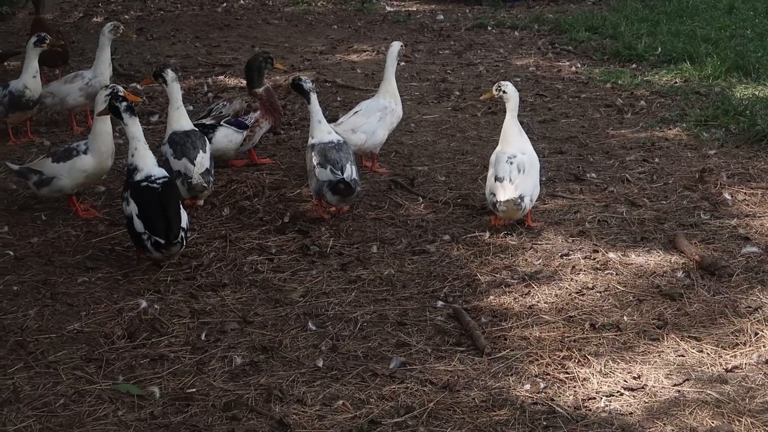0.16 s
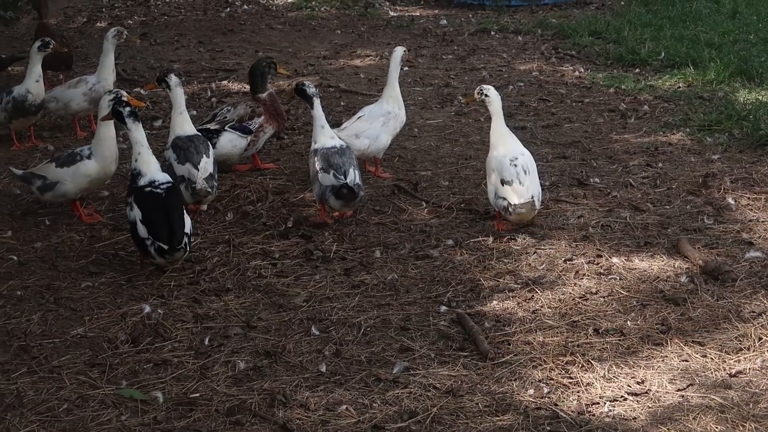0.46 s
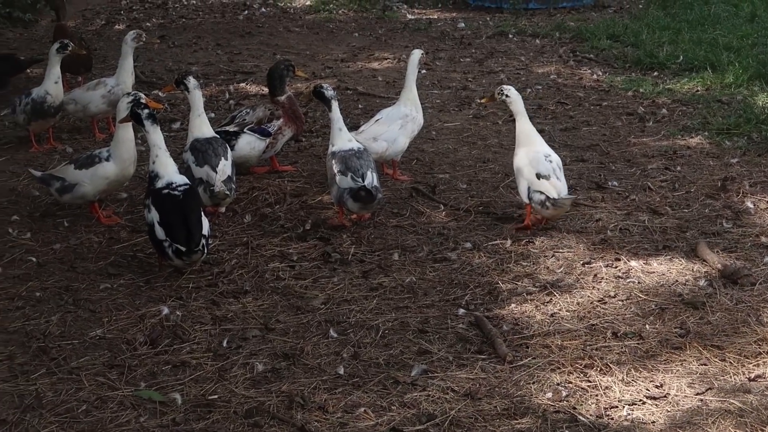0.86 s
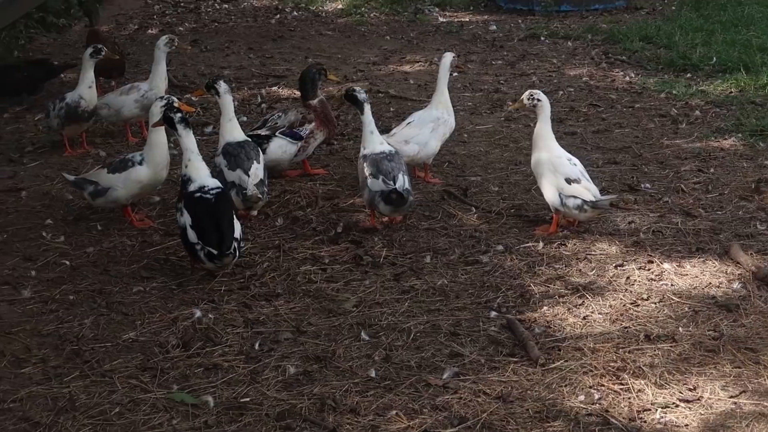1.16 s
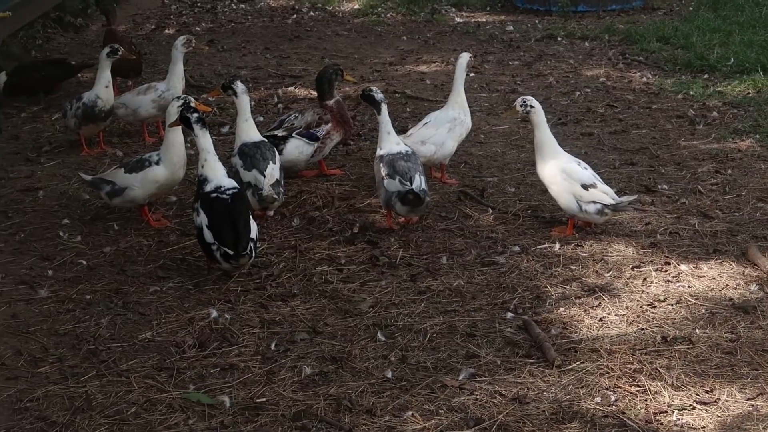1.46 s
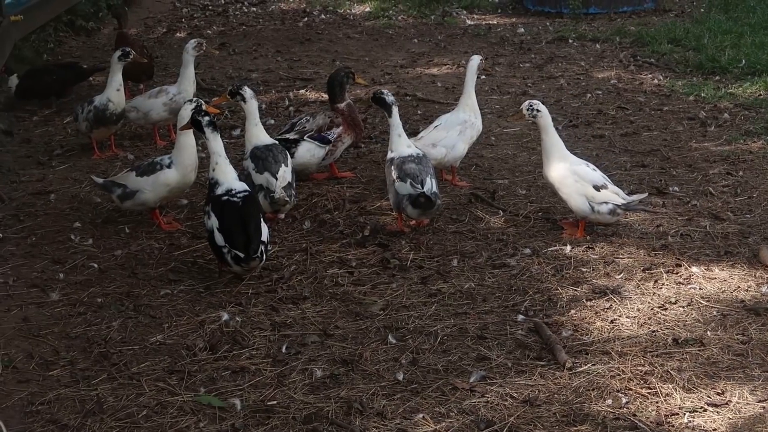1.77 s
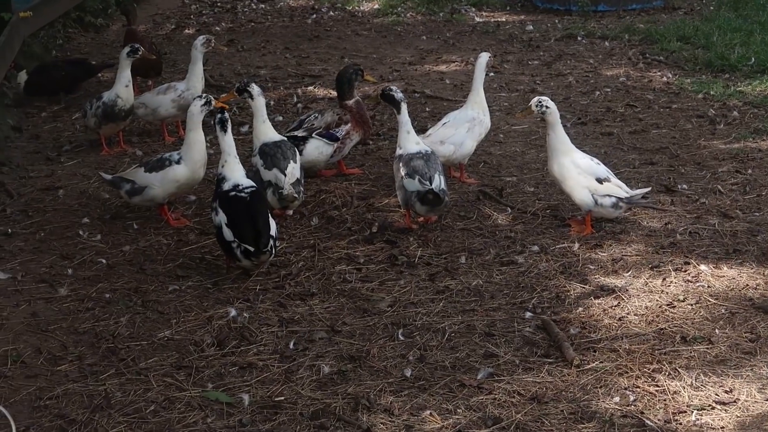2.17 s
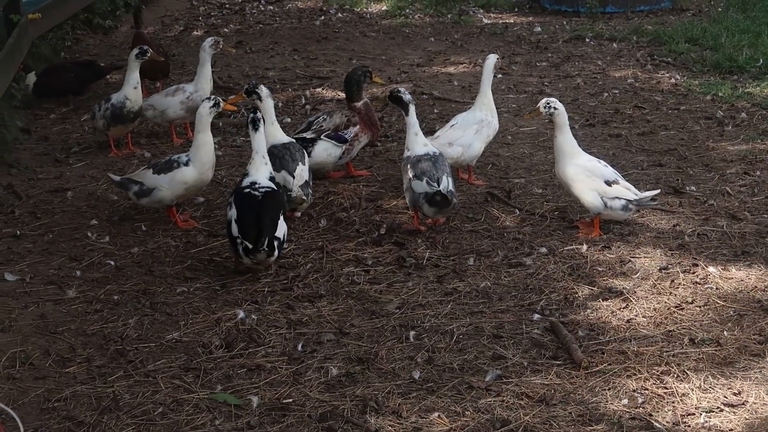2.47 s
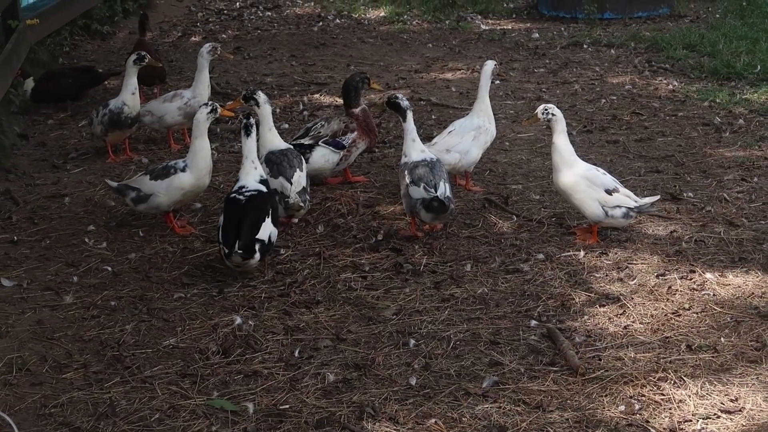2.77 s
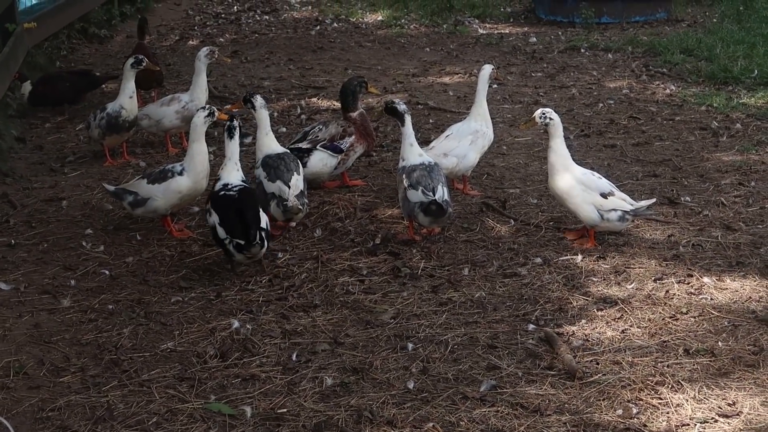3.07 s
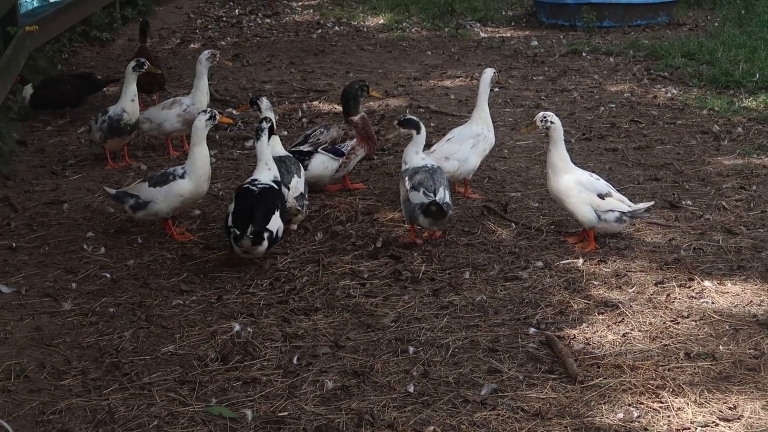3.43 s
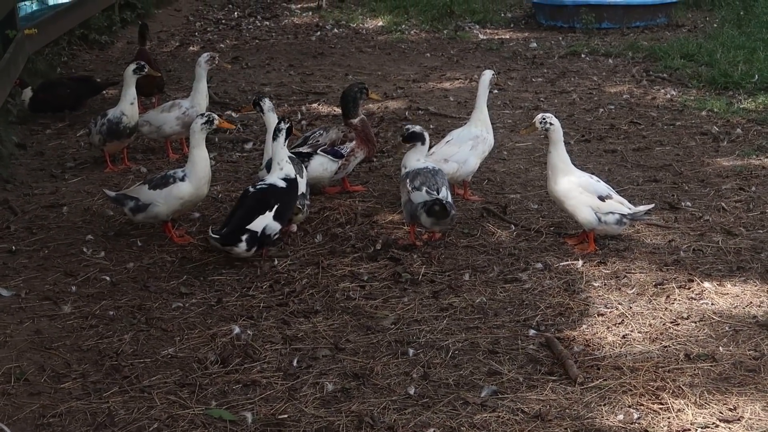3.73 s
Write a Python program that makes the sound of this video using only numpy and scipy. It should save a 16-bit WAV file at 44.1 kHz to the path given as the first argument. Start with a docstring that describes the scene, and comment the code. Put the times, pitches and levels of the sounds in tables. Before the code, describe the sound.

Ducks quack, rasp and honk in a farmyard, with wind bumping the microphone.

```python
"""A duck quacks close by in a farmyard under trees, and a drake rasps three times.
Both voices are quick clicks of the voice box ringing in the throat. Farther off, other fowl sing stacks
of tones, roughened by a second vibration: long wails, a squawk with peeps, and a hoarse honk that
clears as it sinks. Wind buffets the microphone at the start and the end, and a cricket chirps over
the steady noise of leaves and far traffic."""
import sys
import numpy as np
from scipy import signal
from scipy.fft import rfft, irfft
from scipy.io import wavfile
from scipy.ndimage import map_coordinates

SR = 44100
rng = np.random.default_rng(int(sys.argv[2]) if len(sys.argv) > 2 else 0)


def generate_wav(sig):
    """Save sig (samples, or channels by samples) to the path in sys.argv[1] as 16-bit PCM at SR."""
    pcm = np.round(np.clip(np.atleast_2d(sig).T, -1, 1) * 32767).astype(np.int16)
    wavfile.write(sys.argv[1], SR, pcm)


N = 171990
T = np.arange(N) / SR


def undb(db):
    return 10 ** (np.asarray(db) / 20)


def unit(x):
    return x / np.sqrt(np.mean(x ** 2) + 1e-30)


def shape_db(points, hz):
    """Read a curve of (f/Hz, level/dB) points; past its ends it drops 40 dB an octave."""
    f, db = np.array(points, float).T
    octave, known = np.log2(np.maximum(hz, 1)), np.log2(f)
    outside = np.maximum(known[0] - octave, 0) + np.maximum(octave - known[-1], 0)
    return np.interp(octave, known, db) - 40 * outside


def colour(x, points):
    """Make each frequency louder or softer, following (f/Hz, level/dB) points."""
    size = 8192
    cepstrum = irfft(shape_db(points, np.arange(size // 2 + 1) * SR / size) * np.log(10) / 20)
    cepstrum[1:size // 2] *= 2
    cepstrum[size // 2 + 1:] = 0  # ring after a click, never before it
    return signal.fftconvolve(x, irfft(np.exp(rfft(cepstrum))))[:N]


def noise(points):
    return unit(colour(rng.standard_normal(N), points))


def walk(hz):
    """A smooth random wobble of about size 1, with hz new values a second."""
    steps = rng.standard_normal(4000)
    return map_coordinates(steps, [np.minimum(T * hz, len(steps) - 1)], order=3)


def gate(t, db):
    """Loudness that follows the given times and levels, silent outside them."""
    return undb(np.interp(T, t, db)) * (T >= t[0]) * (T <= t[-1])


def split(x, edges_hz):
    """Cut a sound into bands, lowest first."""
    lows = [signal.sosfiltfilt(signal.butter(4, hz, fs=SR, output="sos"), x) for hz in edges_hz]
    return [b - a for a, b in zip([0] + lows, lows + [x])]


# How hard the wind blows: t/s, level/dB
GUSTS = [(0, -45.5), (.04, -30.5), (.075, -47.5), (.11, -25.5), (.17, -37), (.22, -41), (.6, -46.5),
         (1, -45.5), (1.45, -41.5), (1.9, -43), (2.5, -45.5), (2.58, -38), (2.7, -40.5), (2.84, -46.5),
         (2.98, -27.5), (3.07, -29), (3.2, -27.5), (3.26, -28), (3.36, -21.5), (3.44, -17.5), (3.52, -24),
         (3.62, -19.5), (3.72, -24), (3.9, -29)]
# Tone of strong gusts, light breeze and swirls of air: f/Hz, level/dB
GUST_TONE = [(12, -55), (20, -15), (70, 5), (133, 5), (347, -15.5), (452, -25), (515, -44), (604, -46),
             (650, -34), (840, -23.5), (1430, -120)]
BREEZE_TONE = [(12, -78), (20, -3), (75, 0), (107, -6), (151, 0), (358, -11), (390, -16), (493, -18.5),
               (650, -20.5), (840, -49), (1430, -120)]
SWIRL_TONE = [(12, -49), (20, -20), (43, -16), (194, -10), (439, -16), (515, -30), (650, -38), (840, -39),
              (1430, -120)]
# Single thumps of air: t/s, peak level/dB, left minus right/dB, push (1) or pull (-1)
THUMPS = [(.044, -36.5, -3, -1), (0.055, -21.5, -3, -1), (0.104, -30, -2, -1), (3.377, -10.5, -5, -1),
          (3.425, -10.5, -7, 1), (3.4432, -9.5, -6, 1), (3.4546, -4.5, -6.5, 1), (3.493, -8, -3, 1),
          (3.524, -12, -4, -1), (3.61, -19, -8, -1), (3.683, -12, -7, -1), (3.709, -12.5, 4, -1),
          (3.853, -19.5, -7, -1)]


def wind():
    """Air rumbles and thumps on the microphone; strong gusts deepen and swirl at each side."""
    db = np.interp(T, *np.array(GUSTS).T)
    strong = np.clip(db + 39.5, 0, 1)  # gusts count as strong above -39.5 dB
    deep, light, left, right = map(noise, (GUST_TONE, BREEZE_TONE, SWIRL_TONE, SWIRL_TONE))
    swirl_gain = strong * undb(0.6 * np.minimum(db + 19, 0))  # outgrows the gust, up to -19 dB
    swirls = swirl_gain * np.array([left * undb(-9), right * undb(-5.5)])
    lag_s = np.array([[0], [0.00073]])  # gusts pass the left side first
    deep = map_coordinates(deep, [(T - lag_s) * SR], order=1, mode="nearest")
    buffet_db = 3 * strong * np.tanh(walk(45))
    out = (np.sqrt(strong) * deep + np.sqrt(1 - strong) * light + swirls) * undb(db + buffet_db)
    for t, peak_db, pan_db, push in THUMPS:
        u = (T - t - lag_s) / .0011  # time in thump widths
        thump = np.sign(push) * (1 - u ** 2) * np.exp(-u ** 2 / 2)
        out += undb(peak_db + np.array([[pan_db], [-pan_db]]) / 2) * thump
    return out


# Tone of the background, shared by left and right, then opposite in them: f/Hz, level/dB
YARD_MID = [(180, -28), (300, -7.5), (320, -19), (424, -9), (552, -2), (609, -5), (793, -4.5), (1510, -9),
            (1900, -9), (2240, -7), (2470, -8), (5200, -17), (7720, -15.5), (12900, -29), (15400, -49)]
YARD_SIDE = [(120, -33), (200, -13.5), (327, -7.5), (462, -0.5), (515, -31), (585, -3), (640, -3),
             (701, -9), (796, -7), (1230, -5), (1350, -7), (1590, -5.5), (4480, -10.5), (8940, -5),
             (15400, -10)]


def leaves_and_traffic():
    """A soft, slightly flickering hush whose treble reaches left and right out of step."""
    mid = noise(YARD_MID)
    above_500 = signal.sosfilt(signal.butter(4, 500, "high", fs=SR, output="sos"), mid)
    mid /= np.sqrt(np.mean(above_500 ** 2))
    side = noise(YARD_SIDE) * undb(-52 + .6 * walk(2.9))
    mid *= undb(-51 + .6 * walk(6.27))
    return np.array([mid + side, mid - side])


def smear(x, fade_s=.0022):
    """Ground and bodies spread each click over a few milliseconds, keeping its tone."""
    tail = rfft(rng.standard_normal(4096) * np.exp(-T[:4096] / fade_s))
    return signal.fftconvolve(x, irfft(tail / np.abs(tail))[:1024])[:N]


def voice_clicks(start, hz, throat, jitter, shimmer_db, halfway_click, breath_db):
    """Voice box clicks and puffs of air ring in the throat; jitter varies timing, shimmer size."""
    turns = np.cumsum(hz) / SR
    turns -= turns[int(start * SR)]
    chance = rng.standard_normal((2000, 2))
    half = np.arange(int(2 * turns[-1]))
    at = np.interp(half / 2 + jitter * chance[half, 0], turns, np.arange(N))
    size = undb(shimmer_db * chance[half, 1]) * np.where(half % 2, halfway_click, 1)
    clicks, i = np.zeros(N + 2), at.astype(int)
    np.add.at(clicks, i, size * (1 - at + i))  # share each click between two samples
    np.add.at(clicks, i + 1, size * (at - i))
    puffs = np.exp(-(turns % 1) / 2.7) * np.diff(rng.standard_normal(N + 1))
    return unit(colour(smear(unit(clicks[:N])) + undb(breath_db) * unit(puffs), throat))


# The quack: t/s, pulse rate/Hz, then level/dB of the main, upper and chest bands
QUACK = [(0.139, 107.9, -27.5, -42, -39), (0.149, 105, -29.5, -32, -33), (0.159, 106.5, -29, -30, -34),
         (0.175, 106.4, -20.5, -27, -35), (0.189, 107.6, -24.5, -28, -33), (0.239, 112.9, -28.5, -27, -33),
         (0.297, 109.8, -28.5, -26.5, -30.5), (0.317, 113.8, -40, -35.5, -35),
         (0.339, 111.8, -57, -42, -74), (0.345, 106.4, -46, -42, -51)]
# How the duck's throat rings: f/Hz, level/dB
QUACK_THROAT = [(130, -50), (225, -5.5), (330, -11), (450, -11), (560, 1.5), (680, -16.5), (880, -22),
                (1110, -10), (1240, -5.5), (1350, 4.5), (1460, 5.5), (1560, -14), (1720, -1.5), (2100, -3),
                (2400, -10), (2760, -25.5), (3900, -21), (4560, -28), (5250, -21), (6000, -31),
                (11000, -45.5)]


def duck_quack():
    """A train of clicks rings in three bands, each swelling in its own way."""
    t, hz, main_db, upper_db, chest_db = np.array(QUACK).T
    voice = voice_clicks(t[0], np.interp(T, t, hz), QUACK_THROAT,
                         jitter=.008, shimmer_db=2.5, halfway_click=.55, breath_db=-8)
    bands = split(voice, edges_hz=(950, 1600))
    return sum(unit(band) * gate(t, db) for band, db in zip(bands, (chest_db, main_db, upper_db)))


# The middle of each cricket chirp: t/s
CHIRPS = [.17, .39, .58, .83, 1.05, 1.301, 1.55, 1.88, 2.17, 2.44, 2.74, 2.97, 3.2, 3.46, 3.738]


def cricket(hz=9300, width_hz=450, chirp_s=.022):
    """Short swells of thin, high hiss, out of step between left and right."""
    hiss = noise([(hz - width_hz, -20), (hz, 0), (hz + width_hz, -20)])
    chirps = hiss * undb(-54) * sum(np.exp(-((T - t) / chirp_s) ** 2) for t in CHIRPS)
    return np.array([chirps, -chirps])


def call(rows, throat, tones, growl_hz=92.07, waver_db=4):
    """A stack of tones on one gliding pitch; roughness lets a second vibration shake it."""
    t, hz, db, rough = np.array(rows).T
    hz, rough = np.interp(T, t, hz), np.clip(np.interp(T, t, rough), 0, 1)
    growl_rate = growl_hz * (1 + .25 * np.tanh(walk(60)))
    growl = np.sin(2 * np.pi * np.cumsum(growl_rate) / SR)
    turns = np.cumsum(hz) / SR + .12 * rough * (walk(2 * growl_hz) + growl)
    on = slice(int(t[0] * SR), int(t[-1] * SR))
    gains = [undb(shape_db(throat, k * hz[on])) for k in range(1, tones + 1)]
    out = np.zeros(N)
    for k, gain in enumerate(gains, 1):
        flutter = undb(waver_db * walk(35)[on])  # moving air makes each far tone waver
        out[on] += gain * flutter * np.sin(2 * np.pi * (k * turns[on] + rng.random()))
    out[on] /= np.sqrt(sum(gain ** 2 for gain in gains) / 2)
    return out * (1 + .6 * rough * growl) * gate(t, db)


# A long wail and a short answer: t/s, f/Hz, level/dB, roughness (0 clear, 1 hoarse)
WAIL = [(.35, 383.7, -45.5, 0.54), (.42, 443.2, -45.5, 0.56), (.5, 505.3, -43, 0.17), (.62, 514, -38, 0.13),
        (.71, 518, -43.5, 0.08), (.76, 526.7, -38, 0.04), (.81, 522.4, -45.5, 0.06),
        (.865, 526.2, -35, 0.03), (.92, 526, -39, 0), (.97, 524, -42, 0.04), (1.04, 520, -39.5, 0.03),
        (1.12, 506, -45, 0.08), (1.25, 484.4, -44, 0.17), (1.37, 448.7, -43, 0.2), (1.46, 419, -42.5, 0.46),
        (1.56, 378, -61.5, 0.43)]
ANSWER = [(1.34, 486, -51.5, .05), (1.4, 472.3, -44.5, 0.062), (1.5, 494.7, -45, 0.097),
          (1.62, 479, -49, 0.055), (1.66, 464, -51.5, 0.062), (1.68, 477, -76, 0.091)]
# How the two throats ring: f/Hz, level/dB
WAIL_THROAT = [(450, -1.5), (1000, 6.5), (1550, 5.5), (2100, 11.5), (2650, 12.5), (3100, -7), (3600, -15),
               (4200, -10)]
ANSWER_THROAT = [(480, 6), (980, 5), (1470, 8.5), (1950, -5), (2450, 6.5), (3000, -9), (4000, -14)]


def wails():
    """A far voice rises and falls, clear in the middle; an answer overlaps its end."""
    return call(WAIL, WAIL_THROAT, tones=8) + call(ANSWER, ANSWER_THROAT, tones=7)


# The rasps: start t/s, end t/s, peak level/dB, first and last pulse rate/Hz
RASPS = [(.45, 0.69, -37, 86.4, 100.5), (1.202, 1.474, -38, 86.1, 99.9), (2.049, 2.282, -40.5, 85.7, 101.3)]
# How the drake's throat rings: f/Hz, level/dB
RASP_THROAT = [(470, -39), (800, -15), (1010, -29), (1050, -32), (1390, 15.5), (1600, 4), (1740, 18),
               (2200, 2), (2450, 17), (2600, 18.5), (2850, 14.5), (3150, -13), (3480, -5), (3790, -6),
               (4570, -12), (5820, -2.5), (6460, -68), (7500, -4), (9750, -106), (16500, -120)]


def drake_rasps(rise_s=.04, fade_s=.055):
    """Breathy clicks quicken and swell, the top band most, then fade fast."""
    out = np.zeros(N)
    for start, end, db, first_hz, last_hz in RASPS:
        hz = np.interp(T, [start, end], [first_hz, last_hz])
        voice = voice_clicks(start - rise_s, hz, RASP_THROAT,
                             jitter=.06, shimmer_db=3.5, halfway_click=0, breath_db=8)
        t = [start - rise_s, start, end - fade_s, end - fade_s / 2, end + fade_s / 2]
        for band, swell_db in zip(split(voice, edges_hz=(1570, 2150)), (2, 10, 15)):
            swell = gate(t, [db - swell_db - 15, db - swell_db, db, db - 3, db - 24])
            out += band * undb(3 * walk(30)) * swell  # each band wavers by itself
    return out


# A squawk, and one list for each peep: t/s, f/Hz, level/dB, roughness
SQUAWK = [(1.718, 1480, -56, 0), (1.737, 1091, -37, 0), (1.75, 1078, -41, 0.15), (1.757, 1213, -45, 0.2),
          (1.765, 1102, -41, 0.2), (1.777, 1058, -40, 0.2), (1.79, 1153, -42.5, 0.2),
          (1.804, 989, -41.5, 0.2), (1.812, 993, -54, 0.6), (1.823, 1210, -38.5, 1.2),
          (1.833, 1100, -51, 1.1)]
PEEPS = [
    [(1.675, 1690, -59, 0), (1.69, 1790, -58, 0), (1.706, 1870, -50, 0), (1.709, 2250, -62, 0),
     (1.713, 2180, -38, 0), (1.722, 1840, -35, 0), (1.733, 1700, -36, 0), (1.738, 1660, -54, 0)],
    [(1.738, 2150, -52, .3), (1.744, 2150, -40, 0.51), (1.757, 1920, -38, 0.64), (1.762, 1900, -44, 0.61),
     (1.772, 2084, -44, 0.77), (1.784, 2027, -35, 1), (1.79, 2050, -48, .4), (1.799, 2250, -52, .1),
     (1.805, 2000, -37, .1), (1.812, 1850, -37, .2)],
    [(1.746, 1400, -43, .1), (1.753, 1470, -34.5, .1), (1.762, 1480, -42, .1)],
    [(1.9, 1480, -53, .1), (1.93, 1590, -64, .1), (1.945, 2310, -58, .2), (1.957, 1820, -53, 1),
     (1.975, 1950, -52, 1), (1.99, 1880, -68, .5)],
]
# How the squawking throat rings: f/Hz, level/dB
SQUAWK_THROAT = [(900, 3), (1100, 4.5), (1600, -6), (2200, -10), (2600, -13), (3300, -11), (4500, -13.5),
                 (6000, -21)]


def squawk_and_peeps(growl_hz=268):
    """A high, jumpy cry and single-tone peeps, shaken by a fast growl."""
    squawk = call(SQUAWK, SQUAWK_THROAT, tones=5, growl_hz=growl_hz, waver_db=3.5)
    return squawk + sum(call(p, SQUAWK_THROAT, tones=1, growl_hz=growl_hz, waver_db=4.5) for p in PEEPS)


# The soft lead-in and the honk itself: t/s, f/Hz, level/dB, roughness
LEAD_IN = [(2.56, 265.5, -76, 0), (2.59, 306, -42, 0), (2.64, 365.6, -45.5, 0.2),
           (2.72, 392.5, -49.5, 0.36), (2.8, 384.5, -47.5, 0.87), (2.86, 350, -47, 0.77)]
HONK = [(2.845, 330, -41, 0.56), (2.87, 347, -34.5, 0.82), (2.98, 353.1, -31.5, 0.88),
        (3.04, 392.2, -33.5, 0.88), (3.12, 386, -31, 0.83), (3.25, 393.6, -31.5, 0.69),
        (3.35, 400, -30.5, 0.27), (3.395, 395, -31, 0.57), (3.42, 365, -24.5, 0.09),
        (3.46, 362.9, -28, 0.03), (3.5, 353.4, -39, 0.06), (3.525, 348, -35.5, 0.12),
        (3.57, 344.2, -34.5, 0.04), (3.635, 327.5, -36, 0.08), (3.67, 326, -54.5, 0.18),
        (3.8, 334.3, -58.5, 0)]
# How the throat rings in the lead-in, the hoarse part and the clear part: f/Hz, level/dB
LEAD_THROAT = [(250, 34), (400, 0), (750, -1), (1100, -10), (1600, -41), (2000, -16), (2400, -2.5),
               (2900, -12), (3500, -40)]
HOARSE_THROAT = [(290, -45.5), (500, -5), (620, 4), (796, 4), (932, -0.5), (1250, 0), (1300, -13.5),
                 (1500, -8.5), (1620, -78), (1840, -3), (2130, -9.5), (2390, 0), (2830, -5), (3100, -18.5),
                 (3760, -14.5), (5710, -30.5), (7500, -32), (9750, -75), (16500, -120)]
CLEAR_THROAT = [(350, -13.5), (720, 2.5), (1050, -9.5), (1400, 1), (1750, -53), (2100, -7.5), (2500, -12),
                (2800, -6), (3150, -25), (3600, -14.5), (4900, -28.5), (6500, -42)]


def honk(clear_below=.23):
    """A soft start, a hoarse shout, then a clear fall: the throat changes shape as roughness drops."""
    lead_in = call(LEAD_IN, LEAD_THROAT, tones=9)
    flat = call(HONK, [(200, 0), (8000, 0)], tones=18, waver_db=1.5)  # no throat yet
    t, _, _, rough = np.array(HONK).T
    hoarse = np.clip(np.interp(T, t, rough) / clear_below, 0, 1) ** 2
    parts = [(flat * hoarse, HOARSE_THROAT), (flat * (1 - hoarse), CLEAR_THROAT)]
    voice = sum(unit(colour(x, throat)) * np.sqrt(np.mean(x ** 2)) for x, throat in parts)
    low, high = split(voice, edges_hz=(1400,))
    bill_open = np.interp(T, (2.865, 2.89), [0, 1])
    core_rows = np.array(HONK) * [1, 2, 1, .5]  # twice the pitch, half as rough
    core = call(core_rows, HOARSE_THROAT, tones=1, waver_db=4.5)
    return lead_in + low + high * bill_open + undb(-11) * hoarse * core


def echoes(birds, echo_s=.22, spread_s=.07):
    """Place the birds ahead and add short echoes off trunks and sheds."""
    fades = undb(-60 * T[:SR // 2] / np.array([[echo_s], [spread_s]]))
    tails = rng.standard_normal((2, SR // 2)) * fades
    tails /= np.sqrt(np.sum(tails ** 2, axis=1, keepdims=True))
    echo, spread = (signal.fftconvolve(birds, tail)[:N] for tail in tails)
    mid, side = birds + undb(-17) * echo, undb(-19) * spread
    right = map_coordinates(mid, [(T - 2.5e-5) * SR], mode="nearest")  # arrives a touch later
    return np.array([mid + side, right - side])


def scene():
    """The birds and their echoes, with wind, background and cricket, in stereo."""
    birds = duck_quack() + wails() + drake_rasps() + squawk_and_peeps() + honk()
    return echoes(birds) + wind() + leaves_and_traffic() + cricket()


def record(dry, low_hz=45, top_hz=15500):
    """The microphone thins the deepest bass and cuts the highest treble."""
    dry = signal.sosfilt(signal.butter(2, low_hz, "high", fs=SR, output="sos"), dry)
    return signal.sosfilt(signal.ellip(8, .2, 70, top_hz, fs=SR, output="sos"), dry)


dry = scene()
out = record(dry)
generate_wav(out)
```